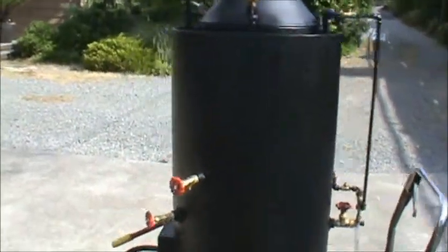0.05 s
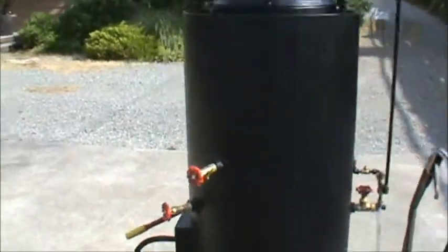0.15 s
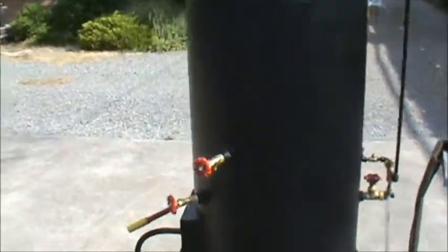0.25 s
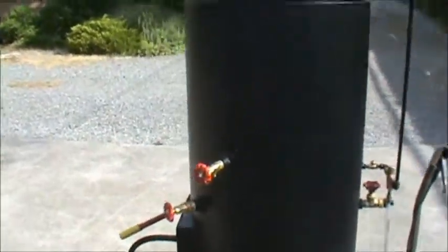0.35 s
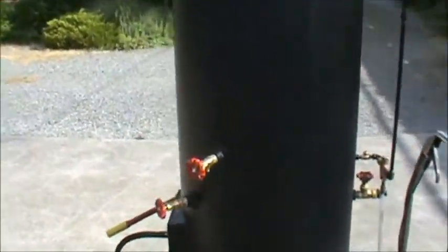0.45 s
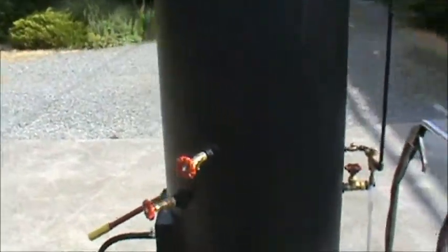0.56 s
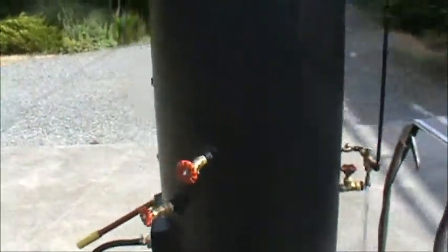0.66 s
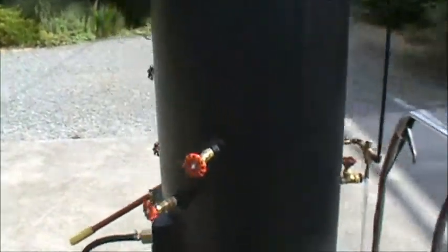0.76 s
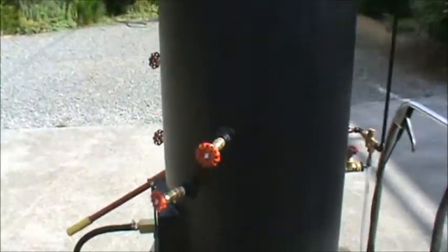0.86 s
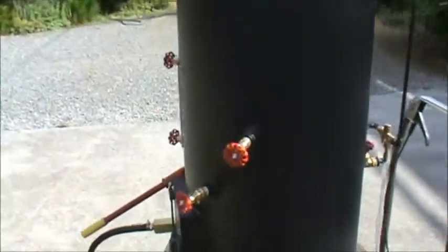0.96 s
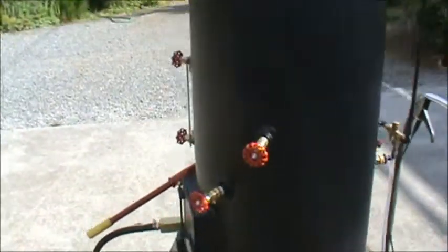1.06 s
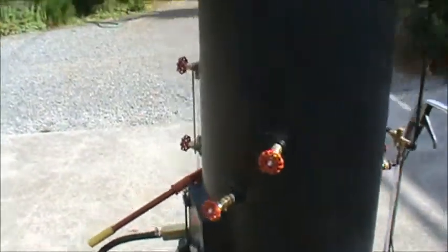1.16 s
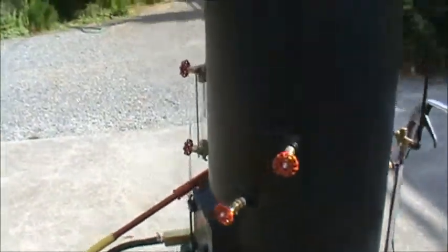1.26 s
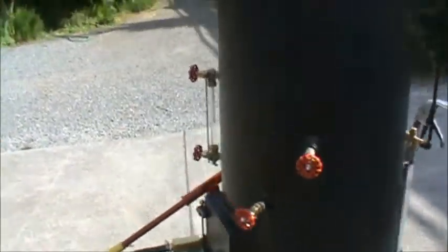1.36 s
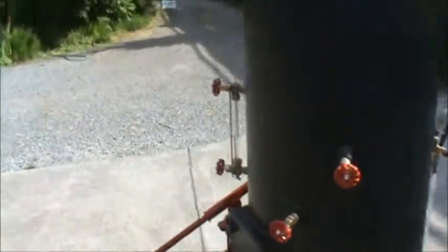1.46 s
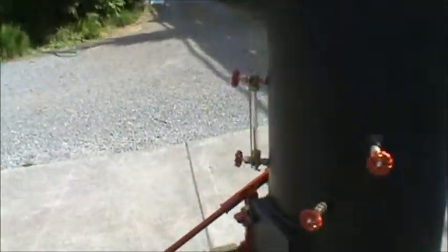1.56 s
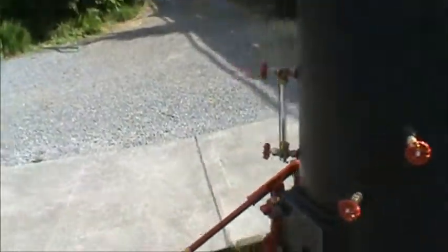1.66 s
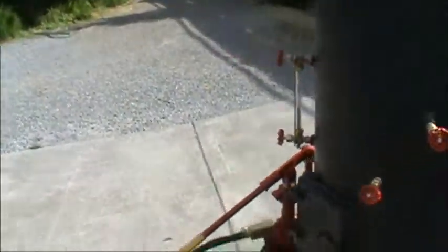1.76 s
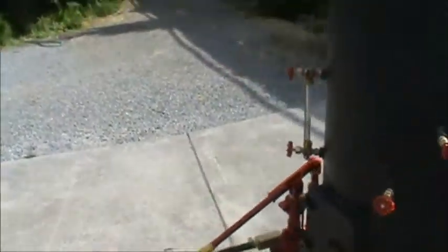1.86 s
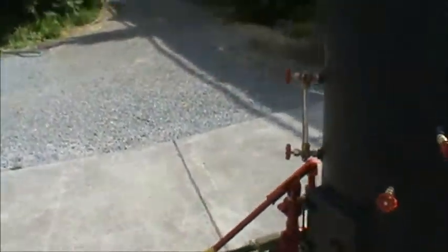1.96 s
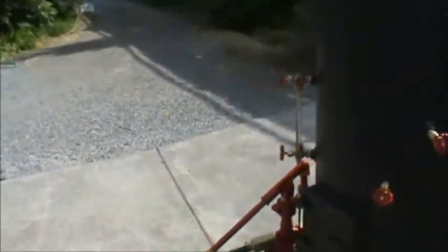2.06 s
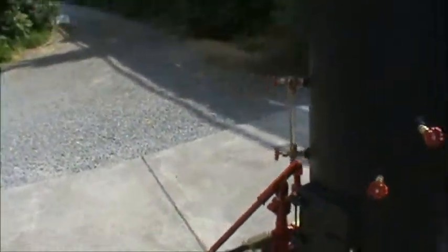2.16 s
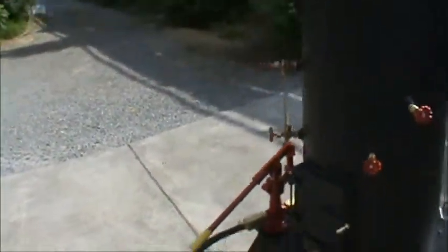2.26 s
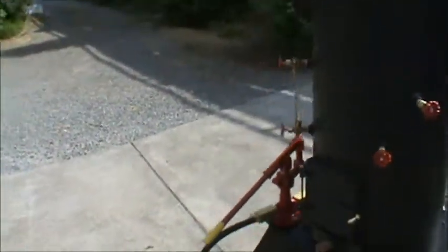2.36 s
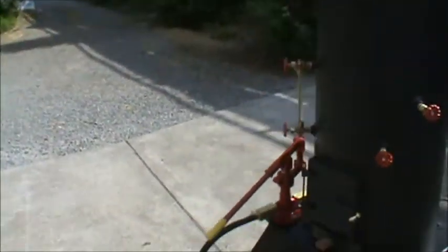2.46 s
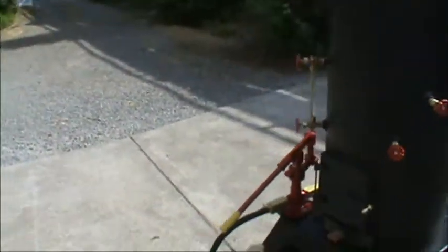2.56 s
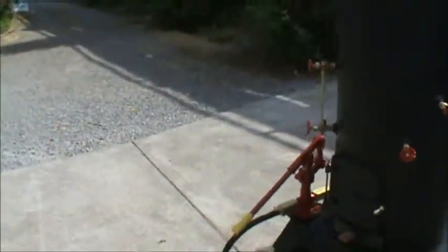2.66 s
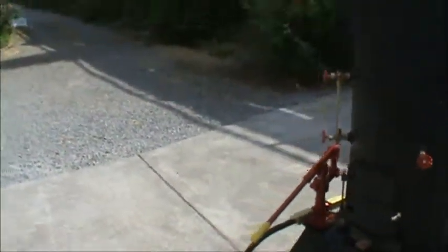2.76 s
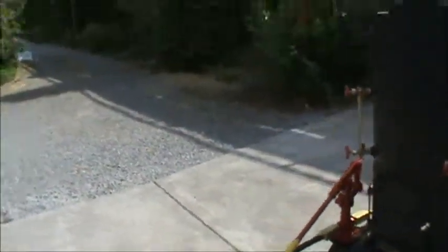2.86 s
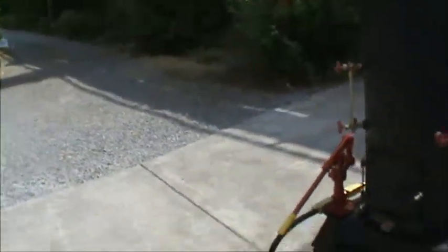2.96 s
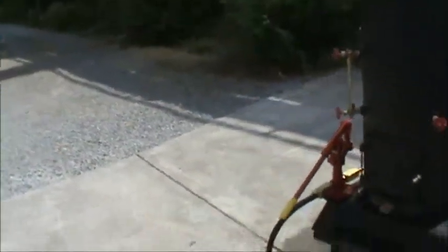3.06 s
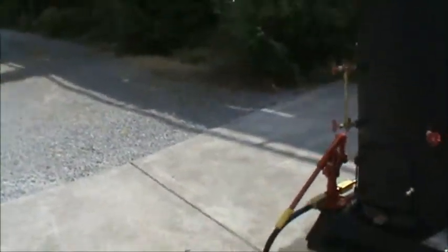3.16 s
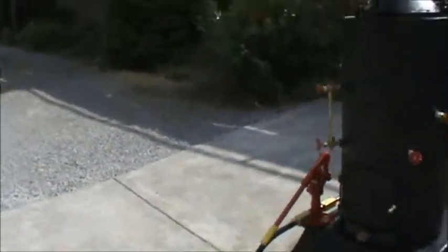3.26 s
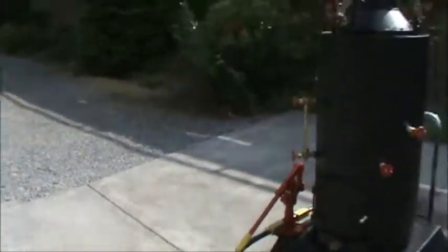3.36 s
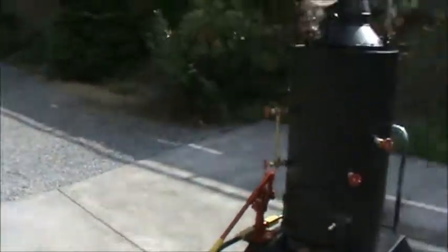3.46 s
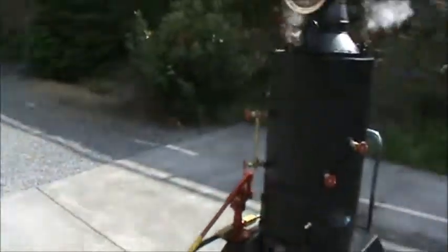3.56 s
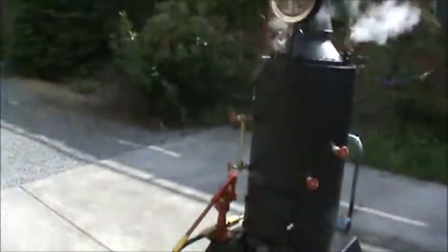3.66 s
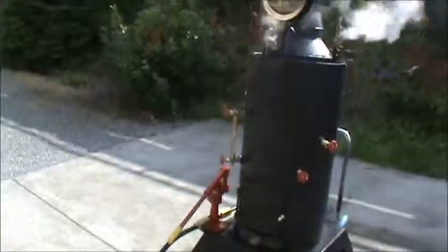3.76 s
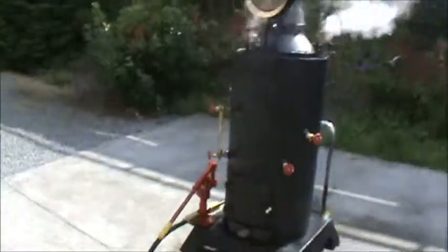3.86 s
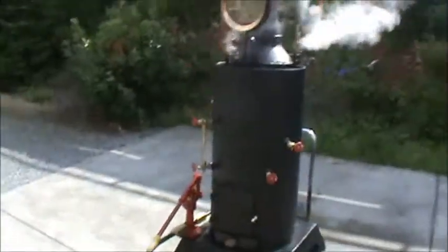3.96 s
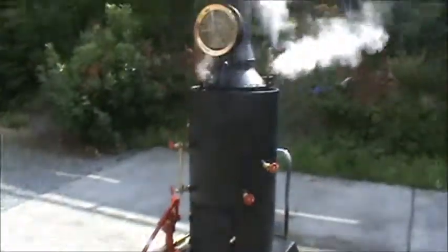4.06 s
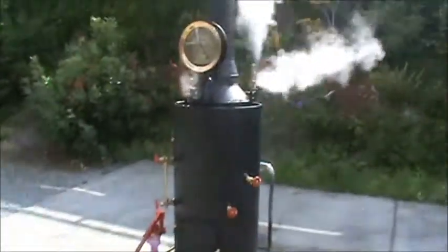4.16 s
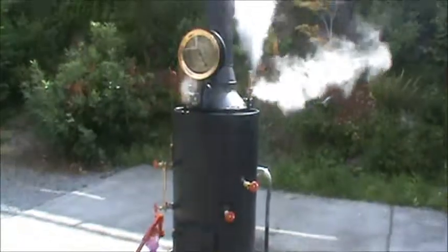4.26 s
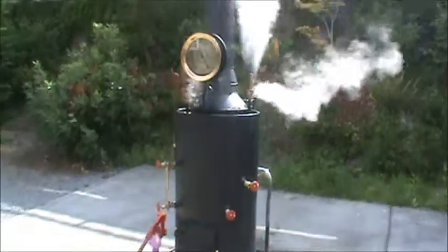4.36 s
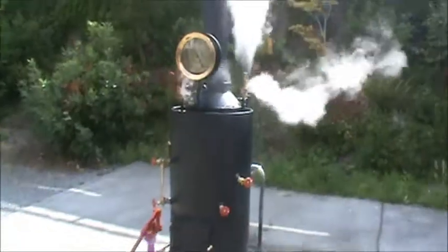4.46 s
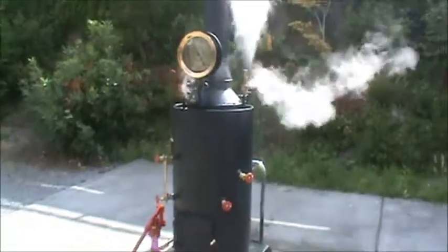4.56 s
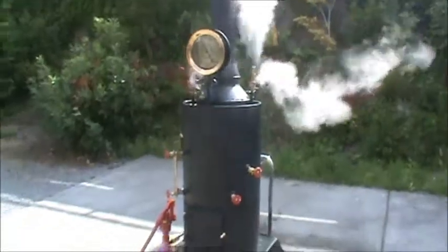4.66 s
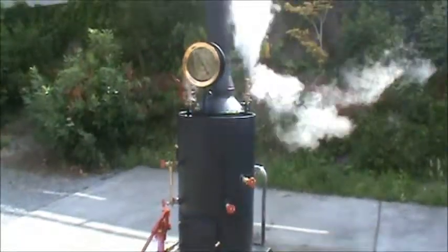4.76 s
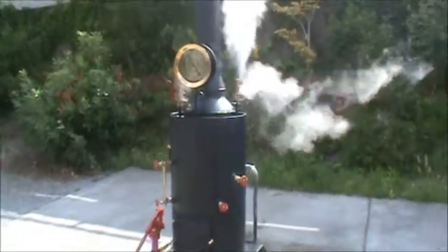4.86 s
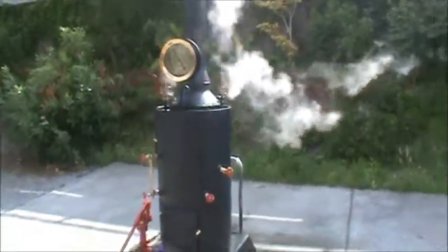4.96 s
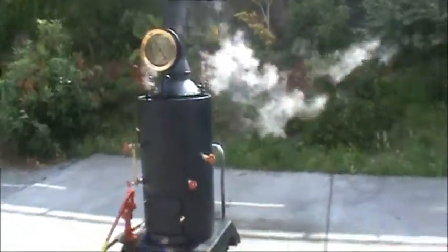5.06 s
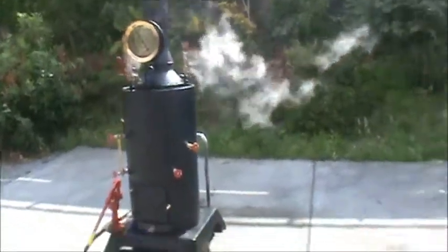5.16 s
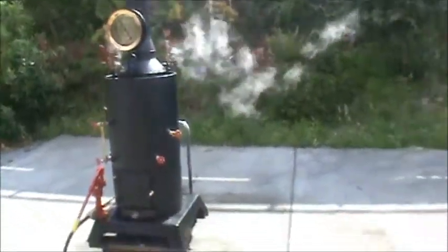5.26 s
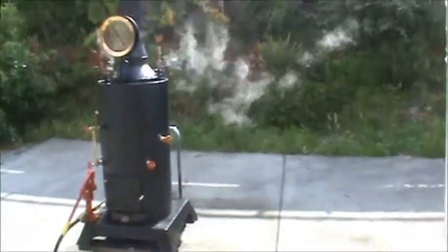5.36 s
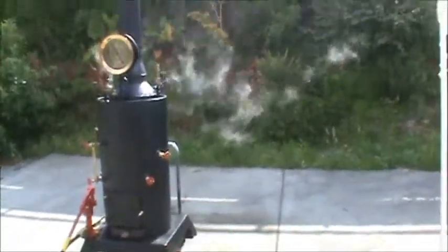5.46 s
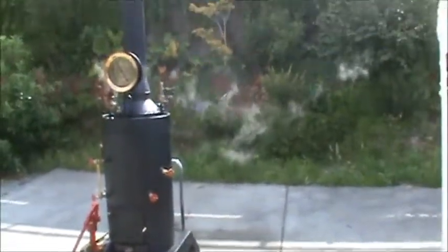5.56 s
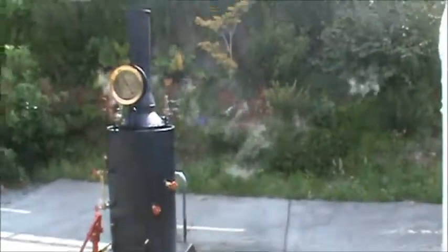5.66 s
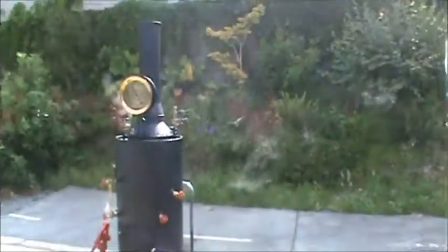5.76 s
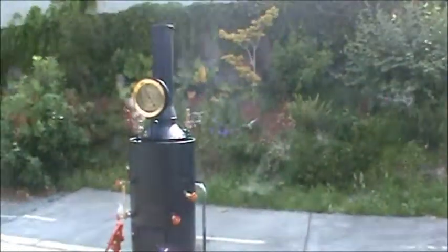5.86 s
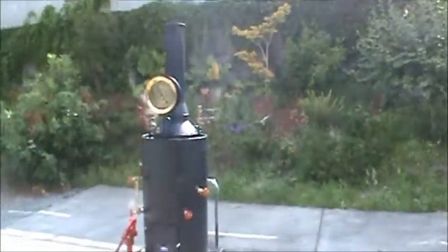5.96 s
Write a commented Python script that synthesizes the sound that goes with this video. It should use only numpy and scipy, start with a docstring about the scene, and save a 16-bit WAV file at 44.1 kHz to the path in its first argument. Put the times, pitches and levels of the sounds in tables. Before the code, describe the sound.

A steady low rumble and wavering hum mix with spitting, faintly whistling steam and tiny handling clicks. Suddenly a violent, sputtering jet of white-noise steam erupts, settles into a dense sizzling roar and cuts off with a dull metallic thump. A short open-yard tail fades into duller boiler noise and weak hissing. Handheld microphones start near and retreat; automatic gain ducks the background.

```python
"""Steam boiler lifts its safety valve

A small upright boiler in a paved yard: noise bands for the rumbling fire, roaring draught and leaking steam,
resonances and a wavering sine for the humming flue, puffs of wind, and short noise bursts for ticks.
The safety valve pops, blows as layered noise for nearly two seconds and seats with a clunk of decaying sines.
The hand-held microphones back away, so the jet's reflections slide; gain control ducks and recovers slowly.
"""
import sys
import numpy as np
from scipy import signal
from scipy.fft import rfft, irfft
from scipy.io import wavfile
from scipy.ndimage import uniform_filter1d

SR = 44100
rng = np.random.default_rng(int(sys.argv[2]) if len(sys.argv) > 2 else 0)


def store_pcm(level_fs):
    """Save levels as 16-bit WAV."""
    pcm = np.round(np.clip(level_fs, -1, 1) * 32767).astype(np.int16)
    wavfile.write(sys.argv[1], SR, np.atleast_2d(pcm).T)


N = 265482
T = np.arange(N) / SR  # time, s
F = np.maximum(np.arange(N // 2 + 1) * SR / N, 1)  # frequency of each spectrum bin, Hz

# Colour of the fire's rumble. Each row: frequency in Hz, spectral level in dB.
FIRE_SPECTRUM = [(20, -22), (42, -20), (55, 4), (80, -0.5), (110, -0.5), (170, -2.5), (260, -5.5),
                 (360, -8.5), (500, -30.5)]
# Colour of the draught in the stack. Each row: frequency in Hz, spectral level in dB.
DRAUGHT_SPECTRUM = [(200, -4.5), (330, -12), (430, -1.5), (560, -1.5), (680, 1), (800, -2.5), (1050, -6.5),
                    (1400, -16), (2200, -25)]
# Standing waves of the flue. Each row: centre in Hz, half width in Hz, gain in dB.
FLUE_MODES = [(61.6, 2.3, -4), (63.2, 2.9, -7.5), (89.4, 5.3, -10), (204, 6, -20.5), (261.6, 7.3, -17)]
# Colour of the leaking steam. Each row: frequency in Hz, spectral level in dB.
LEAK_SPECTRUM = [(710, -19), (1200, 8), (1380, 0), (2310, -0.5), (2480, -0.5), (2650, -2), (3500, -3),
                 (4380, 0), (5150, -0.5), (6510, -16), (10800, -11), (15500, -23)]
# Colour of the weeping, seated valve. Each row: frequency in Hz, spectral level in dB.
WEEP_SPECTRUM = [(1350, 0), (1800, -8.5), (2600, -9.5), (2950, -0.5), (3600, -8), (4700, -3.5), (5300, 1.5),
                 (6000, -8), (6400, -4), (7000, -7), (8800, -2), (10500, -7), (12500, -2.5), (15500, -9.5)]
# Thin whistle of the leak. Each row: centre in Hz, half width in Hz, gain in dB.
WHISTLE_MODES = [(2520, 8, 0)]
# Spurts of the escaping steam. Each row: peak time in seconds, half length in seconds, lift in dB.
STEAM_SPURTS = [(0.677, 0.055, 3.5), (0.915, .08, 2.2), (1.493, 0.19, 2.7), (2.756, 0.14, 1.9),
                (5.45, 0.068, 2), (5.97, .15, 4)]
# Puffs of wind on the microphones. Each row: peak time in seconds, half length in seconds, level in dB.
WIND_GUSTS = [(1.1, .4, -33), (1.557, .12, -25), (2.948, .25, -35.5)]
# Ticks of handling and spitting water.
# Each row: start in seconds, level in dB, centre in Hz, full width in Hz, 60 dB decay in seconds.
HANDLING_TICKS = [(.827, -23.5, 3500, 3500, .05), (.902, -29, 2460, 2500, 0.095),
                  (.984, -27.5, 4000, 2000, 0.14), (1.112, -26, 1030, 200, 0.054),
                  (1.442, -21, 1280, 400, 0.029), (1.514, -24, 4800, 2500, .04),
                  (2.119, -26, 5200, 1800, .02), (2.127, -25, 5460, 2500, 0.016),
                  (2.319, -27, 4500, 2500, .025), (2.715, -16, 5200, 14000, 0.016),
                  (5.241, -31, 1300, 900, .04)]
# Colour of the jet's hiss and sizzle. Each row: frequency in Hz, spectral level in dB.
JET_SPECTRUM = [(1180, -37), (2000, -6.5), (2540, -4), (3260, -4.5), (3870, -0.5), (5000, -0.5),
                (6640, -10), (7360, -7.5), (8960, 1), (11700, -0.5), (15100, 2), (15500, 2)]
# Colour of the jet's roar. Each row: frequency in Hz, spectral level in dB.
ROAR_SPECTRUM = [(100, -28), (250, -12), (400, -14), (650, -4), (1000, 0), (1500, 1), (2000, 3.5),
                 (2600, -15)]
# Extra travel time of two reflections. Each row: time in seconds, short path in seconds, long path in seconds.
REFLECTION_PATHS = [(3.2, .0013, 0.0038), (3.7, 0.0018, 0.0043), (4.2, 0.0018, 0.0048),
                    (4.6, 0.00212, 0.0041), (5.0, 0.0019, 0.0035)]
# Blows of the valve disc. Each row: start in seconds, level in dB.
DISC_BLOWS = [(3.868, -9), (4.988, 8), (5.036, -9)]
# Ringing of the valve and its pipe. Each row: pitch in Hz, relative level in dB, 60 dB decay in seconds.
VALVE_MODES = [(110, -23, 0.075), (270, -12.5, 0.061), (500, -3, 0.027), (824, -26.5, 0.5),
               (1335, -33, 0.31), (2220, -27, 0.18), (2724, -26, 0.21)]
# Diffuse share of most sounds. Each row: frequency in Hz, side minus mid in dB.
STEREO_WIDTH = [(60, -19.5), (300, -11), (700, -9), (1400, -5), (3500, -10.5), (5000, -14), (9000, -22.5),
                (13000, -18.5)]
# Diffuse share of the jet: wider in the lows, narrow in the treble.
# Each row: frequency in Hz, side minus mid in dB.
JET_STEREO_WIDTH = [(300, -15), (1500, -11), (3900, -17), (5000, -29), (9000, -37), (11000, -23),
                    (15000, -20)]
# Microphones step up to the boiler, then back away. Each row: time in seconds, distance in metres.
LISTENING_DISTANCE = [(0, 1.27), (.7, 0.98), (2.3, 1.0), (3.2, 1.05), (4.2, 2.2), (6.0, 2.14)]
# Lean of the top treble as the microphones turn. Each row: time in seconds, left minus right in dB.
TREBLE_LEAN = [(.9, -1), (1.9, -8), (3.5, -13.5), (4.3, -0.5), (6.0, -2)]
# Phase by which the left microphone leads. Each row: frequency in Hz, phase in radians.
LEFT_LEAD = [(0, 0), (100, 0.12), (400, 0.8), (900, 1), (1700, 0.58), (4000, 0.58), (5500, 0),
             (7000, 0.028)]

# Loudness of each part of the boiler.
# Each row: dB at 1 m in front, dB more at the side, dB lost per doubling of distance.
FIRE_LOUDNESS = (-30, -3.5, 4.3)
FLUE_LOUDNESS = (-39.5, 8.1, 1.2)
DRAUGHT_LOUDNESS = (-30.5, 0.34, 5.8)
HISS_LOUDNESS = (-35, 0.26, 4.6)
SIZZLE_LOUDNESS = (-34.5, -3.6, 3.6)
WHISTLE_LOUDNESS = (-49, .8, 6)

# the listener walks round from the fire door to the side of the boiler
ROUND_FROM_S, ROUND_TO_S = 0.83, 1.9
SINGING_HZ = 134.6  # one flue mode that the flames keep sounding
HUM_DIP_DB = 7  # the flue sinks while the valve blows
WEEP_HISS_DB, WEEP_SIZZLE_DB = -33.5, -32
SPURT_HISS_SHARE = 0.48  # a spurt lifts the hiss less than the sizzle

OPEN_S, SEAT_S = 3.202, 4.993  # the safety valve opens and seats
PUFF_DB, PUFF_HZ, PUFF_T60_S, PUFF_LEAD_S = -19.5, 320, 0.24, 0.004  # air pushed out ahead of the steam
CRACK_S = 0.0049  # time the disc takes to crack open
LIFT_DB, LIFT_S = 24, 0.018  # the blast swells as the disc lifts
# base levels of the jet, before pop, beam, lift and choke
JET_ROAR_DB, JET_HISS_DB, JET_SIZZLE_DB = -9.5, 2.5, 4.5
POP_DB, POP_ROAR_DB, POP_S = 5.5, 6, 0.15  # extra hiss and roar while the excess pressure escapes
# backing into the beam of the jet, where the treble is stronger
BEAM_FROM_S, BEAM_TO_S, BEAM_HISS_DB, BEAM_SIZZLE_DB = 3.34, 4.7, 1.5, 5
# the outlet pipe rings, most clearly from beside the beam
OUTLET_HZ, OUTLET_HALF_WIDTH_HZ, OUTLET_DB, OUTLET_BEAM_DB = 5280, 360, -3.5, -5.5
SINK_S, SINK_DB = 0.12, 1.5  # the blast weakens as the disc sinks towards its seat
# the seating disc chokes the flow, then the pipe empties
CHOKE_S, CHOKE_DB, CHOKE_SIZZLE_DB, EMPTY_T60_S = 0.012, -5.5, -4, 0.27
TOP_HZ = 15900  # final top cut


def undb(db):
    """Decibels to gain."""
    return 10 ** (np.asarray(db) / 20)


def curves(table):
    """The columns of a table, joined by straight lines in time."""
    times, *columns = np.transpose(table)
    return [np.interp(T, times, column) for column in columns]


def ramp(start, end):
    """Steady move from 0 to 1 between two times."""
    return np.clip((T - start) / (end - start), 0, 1)


def swell(peak_s, half_length):
    """Smooth rise to 1 and fall around a time."""
    return np.exp(-((T - peak_s) / half_length) ** 2)


def decay(start, t60):
    """Envelope that jumps up at start and dies away by 60 dB in t60 seconds."""
    return (T >= start) * undb(-60 * np.maximum(T - start, 0) / t60)


def walk(rate):
    """Random levels held 1 / rate s, slewed twice and scaled to unit spread."""
    hold = max(int(SR / rate), 1)
    steps = np.repeat(rng.standard_normal(N // hold + 1), hold)
    smooth = uniform_filter1d(uniform_filter1d(steps, hold), hold)[:N]
    return smooth / np.std(smooth)


def colour(points):
    """Gain at every frequency from (Hz, dB) points, joined on a log frequency axis."""
    hz, db = np.transpose(points)
    return undb(np.interp(np.log(F), np.log(hz), db))


def resonances(modes):
    """Summed gain of resonances, each halved at its half width from the centre."""
    return sum(undb(db) / (1 + ((F - hz) / half_width) ** 2) for hz, half_width, db in modes)


def below(hz):
    """Steep low-pass gain."""
    return 1 / np.sqrt(1 + (F / hz) ** 10)


def above(hz):
    """Steep high-pass gain."""
    return 1 / np.sqrt(1 + (hz / F) ** 10)


def noise(gain, side_db=0, width=STEREO_WIDTH):
    """Stereo turbulence with the given spectrum; its mid has unit level, side_db widens it."""
    mid_side_gain = np.array([np.ones(len(F)), colour(width) * undb(side_db)])
    mid, side = irfft(rfft(rng.standard_normal((2, N))) * gain * mid_side_gain, N)
    return np.array([mid + side, mid - side]) / np.std(mid)


def delayed(x, lag):
    """Both channels read a moving lag (s) later."""
    return np.array([np.interp(T - lag, T, channel) for channel in x])


def heard_db(loudness):
    """Level of a part of the boiler from where the listener stands."""
    front_db, side_db, doubling_db = loudness
    doublings = np.log2(curves(LISTENING_DISTANCE)[0])
    return front_db + side_db * ramp(ROUND_FROM_S, ROUND_TO_S) - doubling_db * doublings


def fire(flames):
    """Turbulent combustion rumbles in low noise that flickers with the flames."""
    return noise(colour(FIRE_SPECTRUM)) * undb(heard_db(FIRE_LOUDNESS) + 1.0 * flames)


def draught(flames):
    """Air roars up the stack, flickering with the same flames."""
    return noise(colour(DRAUGHT_SPECTRUM), side_db=-2) * undb(heard_db(DRAUGHT_LOUDNESS) + 0.94 * flames)


def flue():
    """Flames stir the standing waves of the flue; one mode sings on as a wavering hum."""
    boom = noise(resonances(FLUE_MODES), side_db=2)
    # the draught keeps feeding the waves, so their strength stays fairly even
    boom = boom / np.sqrt(uniform_filter1d(boom[0] ** 2, SR // 8))
    phase = 2 * np.pi * np.cumsum(SINGING_HZ * (1 + 0.01494 * walk(10))) / SR
    # more of the hum is heard from the top of the stack on backing away
    away = ramp(OPEN_S, SEAT_S)
    hum = np.sqrt(2) * np.sin(phase) * undb(-6.0 + 2.5 * away + 1.5 * walk(16))
    blowing = ramp(OPEN_S, OPEN_S + 0.11) - ramp(SEAT_S, SEAT_S + 0.1)
    body = (boom * undb(-3.5 - 1.5 * away) + hum) * undb(-HUM_DIP_DB * blowing)
    return body * undb(heard_db(FLUE_LOUDNESS))


def boiler():
    """Fire and draught share one flicker; the flue hums with them."""
    flames = walk(21.98)
    return fire(flames) + flue() + draught(flames)


def escaping_steam(spectrum, hiss_db, sizzle_db, spurt_db, spit):
    """Steam through a narrow gap makes a hiss and a wider, higher sizzle, both lifted by spurts."""
    hiss = noise(colour(spectrum) * above(1370) * below(6700), side_db=0.5)
    hiss = hiss * undb(hiss_db + SPURT_HISS_SHARE * spurt_db + 0.45 * spit)
    sizzle = noise(colour(spectrum) * above(7060), side_db=10.5)
    sizzle = sizzle * undb(sizzle_db + spurt_db + 0.55 * spit)
    return hiss + sizzle


def leaks():
    """Steam spits and whistles at a pipe joint; from seating on, the valve weeps with another colour."""
    spurt_db = sum(db * swell(peak_s, half_length) for peak_s, half_length, db in STEAM_SPURTS)
    spit = walk(29.87)
    whistle = noise(resonances(WHISTLE_MODES)) * undb(heard_db(WHISTLE_LOUDNESS))
    leak = escaping_steam(LEAK_SPECTRUM, heard_db(HISS_LOUDNESS), heard_db(SIZZLE_LOUDNESS), spurt_db, spit)
    weep = escaping_steam(WEEP_SPECTRUM, WEEP_HISS_DB, WEEP_SIZZLE_DB, spurt_db, spit)
    return whistle + leak * (T < SEAT_S) + weep * (T >= SEAT_S)


def breeze():
    """Light wind buffets the microphones in puffs of wide, very low noise."""
    strength = sum(undb(db) * swell(peak_s, half_length) for peak_s, half_length, db in WIND_GUSTS)
    spectrum = colour([(10, -6), (25, -4), (45, 0), (70, 1.5), (150, -20), (400, -46), (2000, -90)])
    return noise(spectrum, side_db=10) * strength


def ticks():
    """Handling and spitting water tick in short noise bursts, each with its own pitch region."""
    out = np.zeros((2, N))
    for start, db, hz, width, t60 in HANDLING_TICKS:
        out += noise(resonances([(hz, width / 2, 0)])) * undb(db) * decay(start, t60)
    return out


def puff():
    """The opening valve shoves the air out of its pipe in a low, dying burst."""
    return noise(below(PUFF_HZ) * above(90)) * undb(PUFF_DB) * decay(OPEN_S - PUFF_LEAD_S, PUFF_T60_S)


def jet():
    """Steam tears out of the valve, swells as the disc lifts, settles and is cut off when it seats."""
    age = np.maximum(T - OPEN_S, 0)
    pop = np.exp(-age / POP_S)
    beam = ramp(BEAM_FROM_S, BEAM_TO_S)
    choke = ramp(SEAT_S - CHOKE_S, SEAT_S)
    # water in the pipe makes the first moments sputter
    sputter_db = 2.0 * np.exp(-age / 0.26) * walk(350)
    flutter_db = 0.5 * walk(45)

    roar = noise(colour(ROAR_SPECTRUM), width=JET_STEREO_WIDTH)
    roar = roar * undb(JET_ROAR_DB + POP_ROAR_DB * pop + 1.27 * walk(17))
    hiss = noise(colour(JET_SPECTRUM) * above(2100) * below(7700), width=JET_STEREO_WIDTH)
    hiss = hiss * undb(JET_HISS_DB + POP_DB * pop + BEAM_HISS_DB * beam + 0.53 * walk(25.1))
    outlet = noise(resonances([(OUTLET_HZ, OUTLET_HALF_WIDTH_HZ, 0)]), width=JET_STEREO_WIDTH)
    outlet = outlet * undb(OUTLET_DB + POP_DB * pop + OUTLET_BEAM_DB * beam)
    sizzle = noise(colour(JET_SPECTRUM) * above(5200) * below(13300), width=JET_STEREO_WIDTH)
    sizzle_db = JET_SIZZLE_DB + BEAM_SIZZLE_DB * beam + CHOKE_SIZZLE_DB * choke
    sizzle = sizzle * undb(sizzle_db + 0.36 * walk(25))

    lift_db = -LIFT_DB * np.exp(-age / LIFT_S)
    sink_db = -SINK_DB * ramp(SEAT_S - SINK_S, SEAT_S)
    emptying = np.where(T < SEAT_S, 1, decay(SEAT_S, EMPTY_T60_S))
    flow = ramp(OPEN_S, OPEN_S + CRACK_S) * emptying
    disc_db = lift_db + sink_db + CHOKE_DB * choke
    return (roar + hiss + outlet + sizzle) * flow * undb(disc_db + flutter_db + sputter_db)


def yard(x, short_db=-9, long_db=-12.5, scatter_db=-14.5, t60=0.4):
    """Two sliding reflections comb the sound; paving and bushes scatter a short tail that slides too."""
    short_lag, long_lag = curves(REFLECTION_PATHS)
    # reflections lose treble
    soft = irfft(rfft(x) / np.sqrt(1 + (F / 4000) ** 2), N)
    echoes = undb(short_db) * delayed(soft, short_lag) + undb(long_db) * delayed(soft, long_lag)
    tail = noise(colour([(100, 6.0), (3000, -1), (15000, -8.5)]), side_db=-24) * decay(0.0037, t60)
    tail = tail[:, :SR // 2]
    tail = tail / np.sqrt(np.sum(tail[0] ** 2))
    scatter = signal.fftconvolve(x, tail, axes=1)[:, :N]
    return undb(2.5) * x + echoes + undb(scatter_db) * delayed(scatter, short_lag)


def valve_thumps():
    """The disc knocks, seats and bounces; each blow rings the valve and its pipe as decaying sines."""
    out = np.zeros(N)
    for start, db in DISC_BLOWS:
        for hz, mode_db, t60 in VALVE_MODES:
            ring = np.sin(2 * np.pi * hz * (T - start))
            out += undb(db + mode_db) * decay(start, t60) * ring
    return out


def scene():
    """The boiler and its valve, heard from a few steps away."""
    return boiler() + leaks() + breeze() + ticks() + puff() + yard(jet()) + valve_thumps()


def gain_control(x, limit_db=-16.5, recover_db_per_s=1.5, window_s=0.0165, attack_s=0.003):
    """Gain drops quickly when the mono sum, less its top treble, passes the limit, then creeps back up."""
    sensed = irfft(rfft(x.mean(0)) * below(6300), N)
    power = uniform_filter1d(sensed ** 2, int(window_s * SR))
    excess_db = np.maximum(10 * np.log10(np.maximum(power, 1e-12)) - limit_db, 0)
    # hold each peak of the excess, released at a steady rate
    recovery_db = recover_db_per_s * T
    held_db = np.maximum.accumulate(excess_db + recovery_db) - recovery_db
    keep = np.exp(-1 / (attack_s * SR))
    reduction_db = signal.lfilter([1 - keep], [1, -keep], held_db)
    return x * undb(-reduction_db)


def microphones(x):
    """Two close ports: the left leads in the mids, the top treble favours the side that faces the steam."""
    sides = np.array([[1], [-1]])
    lead = np.interp(F, *np.transpose(LEFT_LEAD))
    # opposite phase turns of half the lead on each side
    spectrum = rfft(x) * (1 + 1j * sides * np.tan(lead / 2))
    treble = irfft(spectrum * np.exp(-((F - 12200) / 2000) ** 4), N)
    # a left minus right level in dB becomes a share added left and taken right
    lean = np.tanh(curves(TREBLE_LEAN)[0] * np.log(10) / 40)
    return irfft(spectrum, N) + sides * lean * treble


def record(dry):
    """Gain control, the pair of microphones and a steep top cut."""
    top_cut = signal.ellip(12, 0.1, 90, TOP_HZ, fs=SR, output="sos")
    return signal.sosfilt(top_cut, microphones(gain_control(dry)))


dry = scene()
out = record(dry)
store_pcm(out)
```